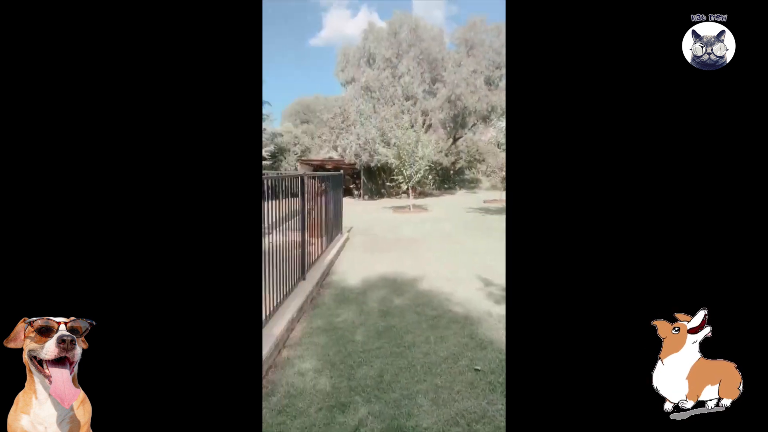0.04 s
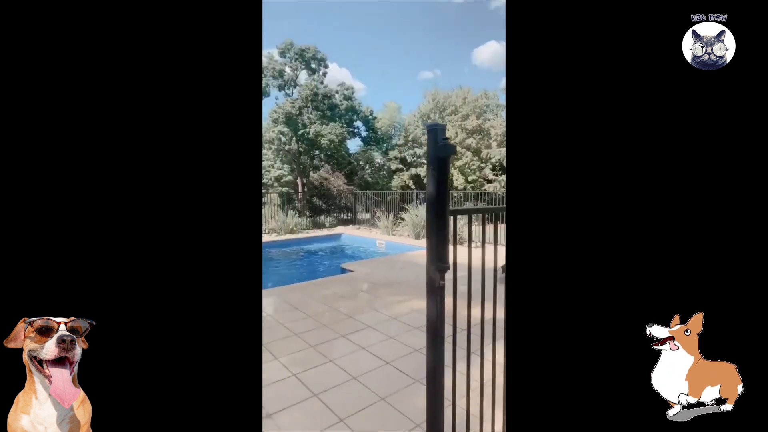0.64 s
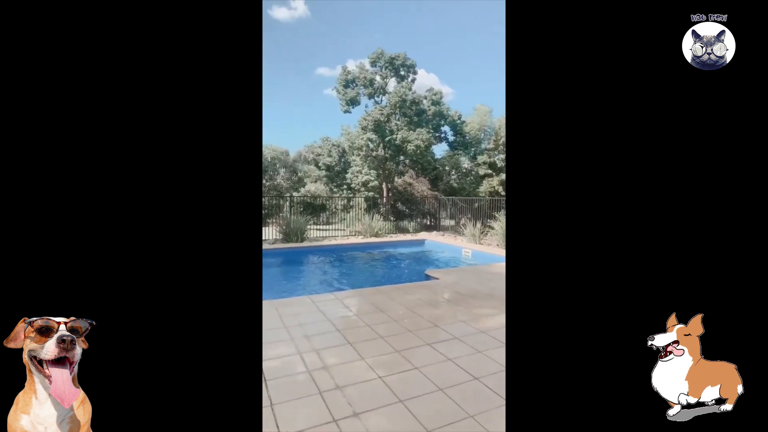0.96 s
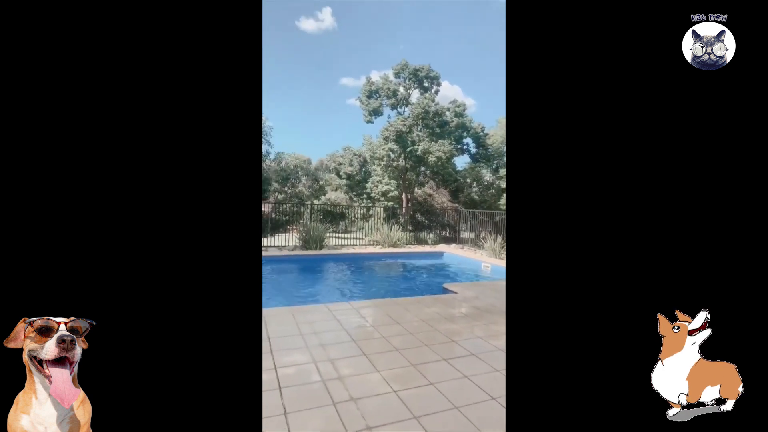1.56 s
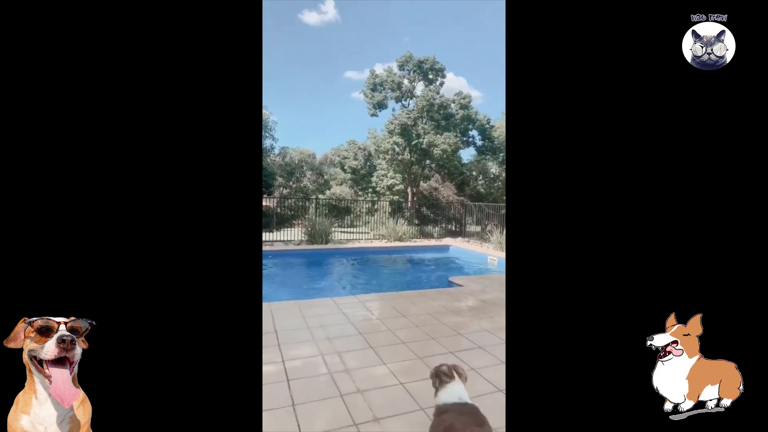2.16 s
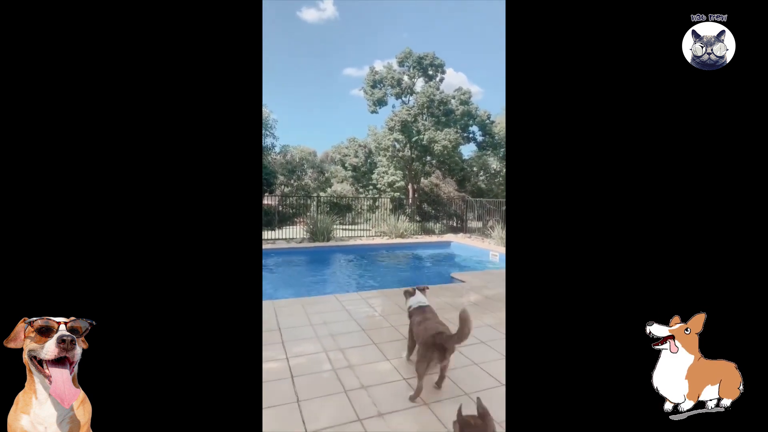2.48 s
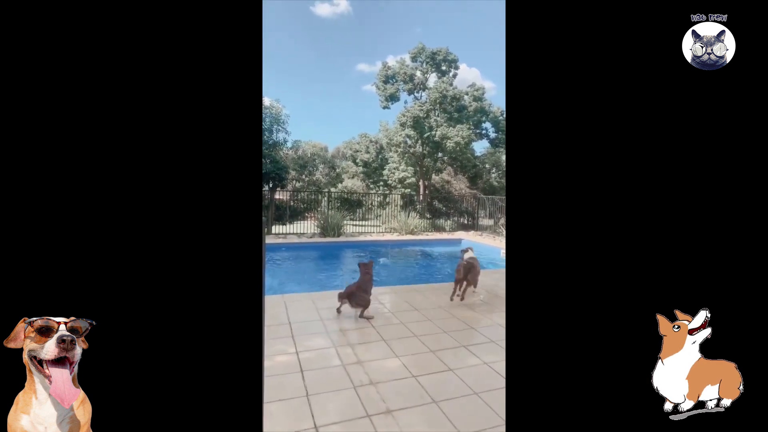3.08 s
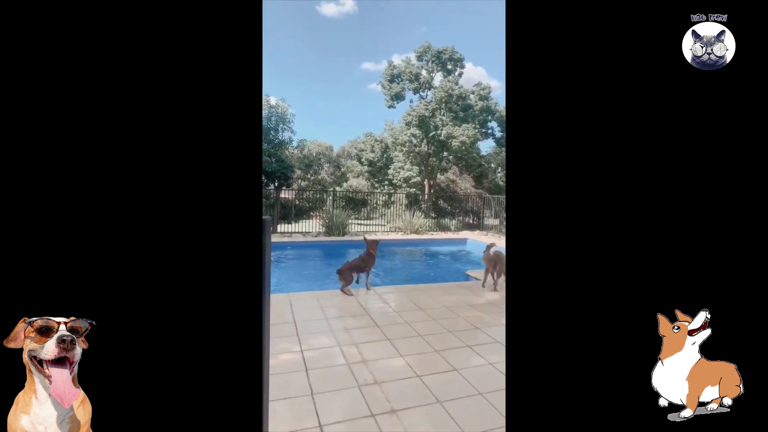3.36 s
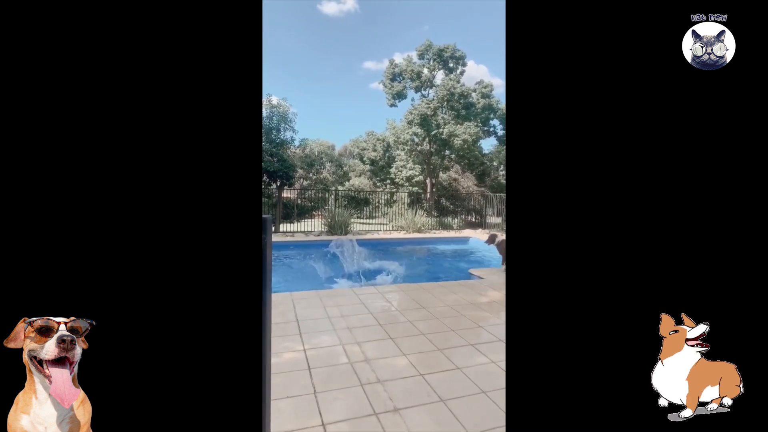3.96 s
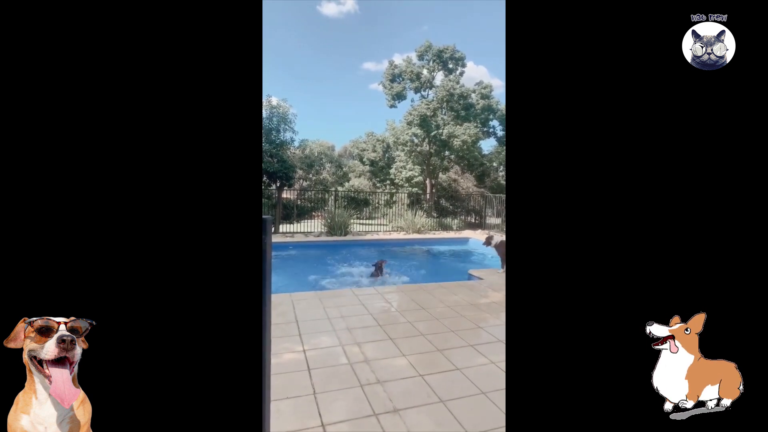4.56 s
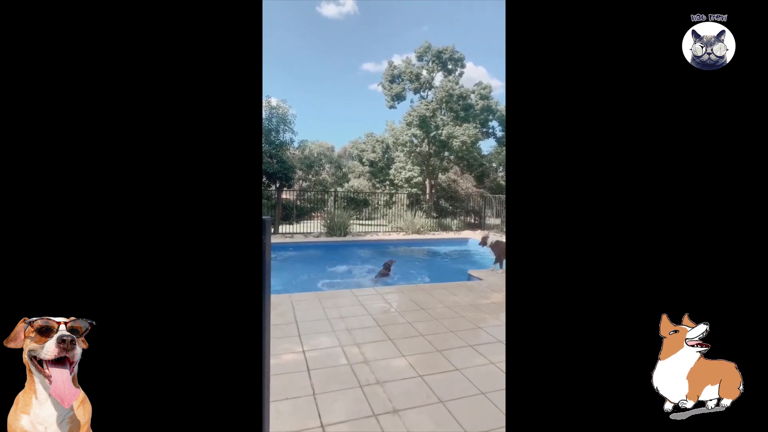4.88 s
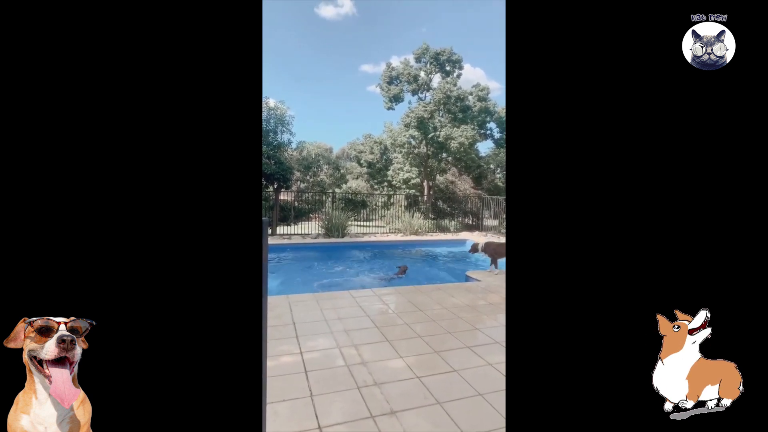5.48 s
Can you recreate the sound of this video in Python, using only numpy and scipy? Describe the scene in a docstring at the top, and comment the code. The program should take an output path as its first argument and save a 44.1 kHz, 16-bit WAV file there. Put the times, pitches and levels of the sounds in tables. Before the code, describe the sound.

In a backyard, a light breeze rumbles on the microphone over the faint hum of a pool pump. Two dogs race across a tiled deck, their metal collar tags jingling brightly as claws tap and skid. One pushes off and lands in the pool with a splash. Spray falls back, the water gurgles, and the dog paddles off with softer sloshes and drips.

```python
"""A breeze brushes the microphone, a pool pump hums and collar tags jingle in their ringing modes.
A bird whistles as two dogs race across a tiled deck, claws tapping and skidding in stick-slip friction.
One pushes off and leaps into the pool: paws slap the surface and trapped air pockets resonate in gulps.
Spray rains back over a churning bubble cloud, and the dog paddles off."""
import sys
import numpy as np
from scipy import signal
from scipy.fft import rfft, irfft
from scipy.io import wavfile
from scipy.ndimage import uniform_filter1d

SR = 44100
rng = np.random.default_rng(int(sys.argv[2]) if len(sys.argv) > 2 else 0)


def to_wav(sig):
    """Store sig (one row per channel, or 1-D mono) as 16-bit WAV at the path in sys.argv[1].

    Samples outside -1..1 are clipped; the rate is SR.
    """
    pcm = np.clip(np.atleast_2d(sig), -1, 1) * 32767
    pcm = np.round(pcm).astype(np.int16)
    wavfile.write(sys.argv[1], SR, pcm.T)  # frames by channels


N = 248283
T = np.arange(N) / SR

# claws skid and pads drag sand: time_s, level_db, resonance_hz, tip_db, tile_db, fade_s, sand_db
SKIDS = [(1.27, -61, 4500, 0, -15, .018, -70), (1.615, -44, 7500, 7.5, -9, 0.0061, -51),
         (2.063, -47, 6060, 7.5, -11, 0.018, -50), (2.106, -44, 3700, 10, -11, 0.0094, -50),
         (2.165, -41.5, 2370, 7, -5, 0.018, -47), (2.187, -26, 2410, 3.5, -15, 0.006, -48),
         (2.264, -38.5, 4020, 1.5, -7, 0.0073, -46), (2.28, -36, 4500, 4.5, -11, 0.0081, -43),
         (2.318, -40.5, 4500, 8, -18, 0.018, -47), (2.338, -43, 3400, -3, -11, 0.014, -50),
         (2.363, -42, 7000, -15, -18, 0.0091, -52), (2.429, -38, 2920, -1, -13, 0.012, -56),
         (2.568, -34.5, 2650, 6, -15, 0.024, -35), (2.733, -39, 3270, -20, -28, 0.014, -33),
         (2.695, -45, 4400, -3, -15, .02, -56), (2.756, -41, 2950, 2, -5, 0.0094, -44),
         (2.829, -39.5, 7240, -3, -8.5, 0.01, -47.5), (2.928, -37, 6750, -1, -22, 0.014, -39),
         (2.955, -33.5, 4760, -0.5, -12, 0.013, -46), (2.985, -39, 3900, 4, -9, 0.0054, -58),
         (3.028, -44, 4500, -3, -12, 0.023, -58), (3.173, -43.5, 4650, 6.5, -8, 0.025, -57),
         (3.258, -31, 6200, -3.5, -17, 0.012, -39), (3.301, -44, 6200, -0.5, -2.5, 0.04, -47),
         (3.437, -42.5, 2720, -18, -3.5, 0.015, -43.5), (3.507, -51, 4700, 0, -20, 0.0086, -40.5)]
# body and paws strike the water: time_s, level_db, centre_hz, attack_s, fade_s, spatter_db, churn_db
WATER_SLAPS = [(3.630, -43, 1100, 0.004, .008, -5, -62), (3.643, -26.5, 780, .0006, 0.0026, -13, -50),
               (3.668, -44, 770, 0.008, 0.041, -4.5, -52), (3.7565, -32, 1350, .0004, 0.002, -8, -48),
               (3.782, -50, 900, 0.012, 0.027, -1.5, -50.5), (3.822, -31, 1220, .0006, 0.01, -9.5, -49),
               (3.865, -42.5, 604, 0.012, .03, -1.5, -39), (3.912, -37, 616, 0.018, 0.017, -11, -34),
               (3.932, -36, 1120, 0.01, 0.026, -8.5, -53), (4.085, -42, 990, .008, 0.067, -23, -35.5),
               (4.455, -48, 600, .005, .015, -19, -40), (4.919, -37, 740, .001, .008, -12, -39),
               (5.045, -44.5, 1000, 0.026, 0.059, -21, -39), (5.18, -47.5, 850, 0.0071, 0.017, -18, -64),
               (5.423, -52, 1400, .002, 0.0053, 8.5, -70), (5.435, -46, 1280, 0.0037, .008, -19, -68)]


def tags(scatter_db=3, detune=0.0038, wobble=0.0075, clash_s=0.00071, chatter_db=-2, chatter_share=0.23):
    """Modal ringing: collar tags knock, then chatter; the discs rub, so each mode's pitch wobbles."""
    # knocks: start_s, level_db, t60_s, low_modes_db, main_ring_hz, clash_db
    hits = [(.228, -54, 0.036, 2, 10360, -8), (.25, -52, 0.043, 3, 10360, -11),
            (0.403, -53.5, 0.14, 5, 10360, -8), (.44, -56, .08, 7, 10360, -8),
            (.462, -54, 0.055, 8, 10360, -8), (.644, -53.5, .04, -10, 10360, -8),
            (.935, -43, 0.043, -3, 10360, -8), (1.616, -24.5, 0.023, 3, 10400, -4),
            (1.788, -44.5, 0.091, -12, 10400, -12), (1.835, -38, .027, -17, 10500, -14),
            (1.894, -40, 0.065, 0, 10430, -6), (1.961, -43, 0.15, 5, 10360, -1),
            (2.048, -30, 0.11, -3, 10400, -10), (2.096, -28.5, 0.11, -1, 10420, -9),
            (2.107, -19, 0.082, 0, 10460, -10), (2.323, -19.5, 0.079, -1.5, 10370, -11),
            (2.339, -19, .037, -10, 10420, -11), (2.362, -25.5, 0.059, -2, 10200, -2),
            (2.38, -25.5, 0.034, -4, 10130, -4), (2.424, -18.5, 0.044, -1, 10360, -3),
            (2.433, -23, 0.034, -2, 10570, -2), (2.533, -26, 0.045, 1, 10330, -8),
            (2.575, -30, .06, 3, 10100, 2), (2.692, -29, 0.11, -7, 10140, -6),
            (2.719, -19.5, .018, -8, 10100, -4), (2.817, -31, 0.055, -2, 10200, -3),
            (2.831, -30.5, 0.067, 5, 10130, 0), (3.095, -38, 0.1, -8, 10230, -8),
            (3.116, -35, 0.039, -4, 10320, -11), (3.620, -40, 0.05, -10, 10400, -9),
            (3.686, -32, 0.03, 8, 10260, -15), (3.713, -38, .06, -16, 10380, -12),
            (3.874, -39.5, 0.067, -10, 10250, -10)]
    # modes of a tag: pitch_hz, level_db, t60_share
    modes = [(7000, -7.5, 0.59), (7100, -16, 0.46), (7600, -6.5, 0.9), (8850, -8, 0.88), (8830, 0, 0.93),
             (10000, -22, .6), (10310, -4, 0.93), (10360, 5, 0.95), (10530, -10, 0.97), (10900, -23, .6),
             (11800, -28, .8), (13020, -13, .9), (13600, -15, .7), (15200, -18, .6)]
    free_ring_hz, low_modes_below_hz = 10360, 9500
    out, t = np.zeros(N), T[:SR // 4]
    mode_hz, mode_db, _ = np.transpose(modes)
    touches = clicks(1300, 1.6)
    rubbing = [walk(350) for _ in modes]
    for start, db, t60, low_db, main_hz, clash_db in hits:
        chance, i = rng.standard_normal((len(modes), 2)), int(start * SR)
        weights = undb(mode_db + low_db * (mode_hz < low_modes_below_hz) + scatter_db * chance[:, 0])
        weights /= np.linalg.norm(weights)
        chime = undb(clash_db) * band(rng.standard_normal(len(t)) * np.exp(-t / clash_s), 6700, 11800)
        for (hz, _, share), weight, shift, rub in zip(modes, weights, chance[:, 1], rubbing):
            pitch = hz * main_hz / free_ring_hz * (1 + detune * shift + wobble * rub[i:i + len(t)])
            chime += weight * sine(pitch) * undb(-60 * t / (t60 * share))
        chatter = touches[i:i + len(t)] * np.exp(-t / (chatter_share * t60))
        knocks = (t == 0) + undb(chatter_db) * chatter / np.linalg.norm(chatter)
        add(out, start, undb(db) * signal.fftconvolve(knocks, chime))
    return out


def buckle():
    """Damped vibration: a struck collar buckle chinks in a single mode."""
    # chinks: start_s, pitch_hz, level_db, t60_s
    chinks = [(1.857, 3660, -27, 0.022), (2.106, 3390, -30, 0.043), (2.188, 2780, -31, 0.051),
              (2.352, 7640, -21.5, 0.055), (2.574, 2763, -21.5, 0.084), (2.794, 8680, -37, 0.12),
              (4.003, 7100, -30, 0.043)]
    out = np.zeros(N)
    for start, hz, db, t60 in chinks:
        add(out, start, undb(db) * ring(hz, t60, onset_cycles=6.2))
    return out


def claw_on_tile(contact, hz, tip_db, tile_db):
    """Source and filter: contact force sounds through the tile, the claw's resonance and its hard tip."""
    resonance = band(contact, hz * .95, hz * 1.05, order=1)
    claw = undb(-2.5) * band(contact, 1550, 6040, order=3) + undb(-6) * resonance
    tile = band(contact, 140, 2120, order=3)
    tip = band(contact, 5230, 11070, order=3)
    return undb(tile_db) * tile + claw + undb(tip_db) * tip


def claws(grip_s=0.0047, lead_s=.03):
    """Impact and stick-slip friction: claws tap the tiles and skid over grit."""
    # taps: start_s, level_db, resonance_hz, tip_db, tile_db, contact_s
    taps = [(1.487, -45.5, 4300, 1, -20, 0.00087), (1.511, -49, 4500, 7, -20, .0008),
            (1.558, -30.5, 4670, -9, -6, 0.00028), (1.579, -38, 4970, -10, -20, .0003),
            (1.608, -39, 6500, -1, -2, .001), (1.7, -43.5, 3380, -7, 0, 0.0013),
            (1.713, -45, 2900, -12, -8, .001), (1.857, -32, 3680, 2.5, -21, .0006),
            (1.8675, -26.5, 4500, 4.5, -2.5, 0.00026), (2.190, -14.5, 4480, 5, -10, 0.001),
            (2.196, -24.5, 2660, 6.5, -3.5, 0.0021), (2.354, -30, 7000, -17, -1, 0.0017),
            (2.379, -32, 6700, 0, -2, 0.00097), (2.568, -23, 6900, -9, -16, 0.0026),
            (2.578, -30.5, 2770, -1, 2.5, .0015), (2.6277, -24, 3300, 5, 1, 0.0017),
            (2.687, -30.5, 6870, -8, -7, 0.0013), (2.774, -24, 4860, -6, -8.5, 0.0022),
            (2.874, -27, 5400, -4.5, -6.5, 0.0026), (2.9351, -25, 6700, 5, -23, 0.00089),
            (2.9504, -19.5, 6500, 1, -15, 0.00062), (2.968, -26, 5660, -12, -14, .0008),
            (2.9887, -26, 3630, -14, -12, 0.0014), (2.9925, -29, 4000, 2, -11, .0012),
            (3.0432, -30.5, 6340, -4.5, -12, 0.0017), (3.155, -34.5, 4600, 8, -5, 0.0017),
            (3.171, -39.5, 5140, 12, -11, 0.0016), (3.257, -25, 6250, 2.5, -17, 0.0011),
            (3.401, -27, 6440, 0, -10, .0008)]
    out, t = np.zeros(N), T[:SR // 6]
    for start, db, hz, tip_db, tile_db, contact_s in taps:
        contact = burst(np.exp(-t / contact_s), 100, 18000, order=1)
        add(out, start, undb(db) * claw_on_tile(contact, hz, tip_db, tile_db))
    # a sliding claw catches and lets go thousands of times a second
    grit = unit(clicks(9000, 2) * undb(3 * np.clip(walk(500), -2, 2)))
    for when, db, hz, tip_db, tile_db, fade_s, _ in SKIDS:
        contact = swell(t - lead_s, grip_s, fade_s) * grit[int(when * SR):][:len(t)]
        add(out, when - lead_s, undb(db) * claw_on_tile(contact, hz, tip_db, tile_db))
    return out


def pads(attack_s=0.0017, lead_s=.03):
    """Soft impact: pads slap the deck in bursts of noise and thud in quickly damped tones; the last, higher
    thud is a knock at the pool edge."""
    # slaps: time_s, level_db, centre_hz, fade_s
    slaps = [(2.276, -38, 560, .008), (2.340, -34.5, 1350, 0.0043), (2.354, -40, 1400, 0.0036),
             (2.375, -43, 845, .005), (2.572, -38, 1400, .003), (2.579, -41, 620, .004),
             (2.629, -38, 1140, .003), (2.659, -43, 1100, .005), (2.742, -47, 900, .004),
             (2.843, -47, 900, .004), (2.877, -41.5, 1050, 0.0087)]
    # thuds: start_s, pitch_hz, level_db, t60_s
    thuds = [(2.189, 290, -35, 0.017), (2.278, 230, -31, 0.086), (2.279, 343, -30, 0.049),
             (2.289, 108, -28.5, 0.092), (2.388, 76.6, -28.5, 0.056), (2.526, 210, -26.5, 0.022),
             (2.776, 258, -34.5, 0.033), (2.99, 250, -35.5, .04), (2.878, 335, -33.5, 0.033),
             (3.352, 1370, -29.5, 0.014)]
    out, t = np.zeros(N), T[:SR // 6] - lead_s
    for when, db, hz, fade_s in slaps:
        add(out, when - lead_s, undb(db) * burst(swell(t, attack_s, fade_s), hz / 1.5, hz * 1.76))
    for start, hz, db, t60 in thuds:
        add(out, start, undb(db) * ring(hz, t60, onset_cycles=0.11))
    return out


def sand(attack_s=0.031, release_s=0.051):
    """Granular friction: sliding pads drag fine sand, with a few coarse grains cracking in it."""
    # grit under the running dogs: time_s, level_db
    patter = [(1.2, -67), (1.75, -56.5), (2.01, -50), (2.2, -48), (2.87, -55.5), (3.13, -46.5),
              (3.19, -47.5), (3.36, -46), (3.59, -51), (3.74, -50), (3.8, -44.5)]
    # spectrum of the scuffing: frequency_hz, level_db
    spectrum = [(240, -49.5), (400, 1.5), (536, -3.5), (626, -17), (906, -12), (1400, -6.5), (1820, -7),
                (2670, -3), (3640, -7), (3990, 0), (5690, -4), (6050, -4.5), (6540, -1.5), (10500, 1),
                (16000, -20.5)]
    drag = undb(-1) * fader(patter)
    for when, *_, sand_db in SKIDS:
        drag = np.hypot(drag, undb(sand_db) * swell(T - when, attack_s, release_s))
    fine = clicks(16000, 3.6) * undb(2 * walk(160))
    coarse = undb(-8) * clicks(600, 2)
    return drag * colour(fine + coarse, spectrum)


def rasps(judder_share=.6, edge_share=0.31):
    """Friction-driven resonance: a slipping claw judders in a narrow band that slides with the load."""
    # slips: start_s, length_s, start_hz, end_hz, level_db
    slips = [(2.3105, 0.0085, 3890, 4760, -32.5), (2.311, 0.0071, 1750, 1950, -43.5),
             (2.722, 0.018, 3995, 3730, -37.5), (2.729, 0.033, 3006, 2690, -41.5),
             (2.797, 0.021, 2100, 2110, -50.5), (2.983, 0.013, 3580, 3860, -34.5),
             (3.410, 0.038, 3780, 2510, -48.5)]
    out = np.zeros(N)
    for start, length, from_hz, to_hz, db in slips:
        progress = np.linspace(0, 1, int(length * SR))
        judder = (walk(judder_share * from_hz) + 1j * walk(judder_share * from_hz))[:len(progress)]
        slide = np.exp(2j * np.pi * np.cumsum(from_hz * (to_hz / from_hz) ** progress) / SR)
        pressure = np.clip(np.minimum(progress, 1 - progress) / edge_share, 0, 1)
        add(out, start, undb(db) * unit(pressure * (judder * slide).real))
    return out


def push_off(start_s=3.17, end_s=3.545, edge_s=0.006, db=-47):
    """Sliding friction: the hind claws drag in one long scratchy hiss before the leap."""
    pressure = np.clip((T - start_s) / edge_s, 0, 1) * np.clip((end_s - T) / edge_s, 0, 1)
    catches = unit(clicks(5000, 3) * undb(2.5 * walk(150)))
    return undb(db + walk(24.55)) * pressure * band(catches, 3000, 6200)


def water_slaps(lead_s=.1):
    """Impact on water: each push of body or paw makes a low smack and a brighter spatter."""
    out, t = np.zeros(N), T[:SR // 3] - lead_s
    for when, db, hz, attack_s, fade_s, spatter_db, _ in WATER_SLAPS:
        push = swell(t, attack_s, fade_s)
        smack = burst(push, hz / 1.49, min(hz * 1.72, 1500), order=3)
        spatter = band(rng.standard_normal(len(t)) * push, 1600, 4700)
        add(out, when - lead_s, undb(db) * (smack + undb(spatter_db) * spatter))
    return out


def gulps(peak_share=0.31, waver_depth=0.036):
    """Cavity resonance: large air pockets glide as they sink or rise, and waver as they change shape."""
    # air pockets: start_s, length_s, start_hz, end_hz, level_db
    pockets = [(3.642, 0.01, 384, 336, -28), (3.757, 0.01, 380, 300, -35), (3.855, 0.052, 399, 600, -38),
               (3.894, 0.056, 342, 322, -26), (3.932, 0.045, 274, 220, -27.5),
               (3.988, 0.041, 216, 190, -29.5), (4.009, 0.05, 98, 130, -30), (4.035, 0.0574, 159, 292, -24),
               (4.083, 0.045, 191, 209, -19.5), (4.091, 0.036, 86, 100, -21.5),
               (4.112, 0.02, 276, 330, -22), (4.14, 0.035, 110, 95, -29), (4.214, 0.018, 290, 320, -28.5),
               (4.315, 0.075, 152, 292, -32), (4.337, 0.019, 443, 410, -32), (4.395, 0.066, 282, 318, -34),
               (4.454, 0.021, 215, 200, -27), (4.468, 0.04, 85, 95, -32), (4.505, 0.052, 270, 410, -38),
               (4.887, 0.015, 430, 400, -33.5), (4.912, 0.018, 498, 402, -30),
               (4.918, 0.022, 286, 205, -29.5), (4.936, 0.014, 135, 111, -25.5),
               (4.974, .07, 150, 221, -36.5), (5.048, 0.029, 418, 371, -26), (5.063, 0.035, 182, 320, -30),
               (5.086, 0.054, 314, 466, -36), (5.135, 0.047, 480, 554, -43.5),
               (5.281, 0.018, 550, 620, -43), (5.327, 0.045, 544, 950, -47.5), (5.444, 0.02, 393, 410, -37)]
    out = np.zeros(N)
    waver = 1 + waver_depth * walk(120)
    for start, length, from_hz, to_hz, db in pockets:
        progress = np.linspace(0, 1, int(length * SR))
        pitch = from_hz * (to_hz / from_hz) ** progress * waver[int(start * SR):][:len(progress)]
        envelope = np.sin(np.pi / 2 * np.interp(progress, [0, peak_share, 1], [0, 1, 0])) ** 2
        add(out, start, undb(db) * envelope * sine(pitch))
    return out


def plunge(peak_db, growth_db_per_s, hold_s, release_db_per_s, start_s=3.823, attack_s=0.017):
    """Exponential envelope of thrown water: it starts at once, lasts for hold_s, then dies away."""
    age = T - start_s
    below_peak_db = np.maximum(growth_db_per_s * (hold_s - age), release_db_per_s * (age - hold_s))
    return np.exp(np.minimum(age / attack_s, 0)) * undb(peak_db - below_peak_db)


def bubbles(lo_hz, hi_hz, cycles, spread_db, count, rise_octaves):
    """Bubble resonance: many small bubbles each ring for some cycles, rising in pitch as they fade."""
    out = np.zeros(N)
    for when, pitch, size, life in rng.random((count, 4)):
        hz = lo_hz * (hi_hz / lo_hz) ** pitch
        t60 = cycles * (.5 + life) / hz
        strength = undb(-spread_db * np.log(max(size, .03))) * np.sqrt(hz)
        add(out, when * T[-1], strength * ring(hz, t60, rise_octaves / t60, onset_cycles=0.23))
    return unit(out)


def churn(attack_s=0.0083, release_s=0.1):
    """Air entrainment: the plunge and every slap leave a cloud of ringing bubbles."""
    # spectrum of the cloud: frequency_hz, level_db
    spectrum = [(60, -30), (110, -13), (200, -7.5), (300, 1), (450, 2.5), (560, -3.5), (680, -11.5),
                (1200, -16), (1600, -40.5)]
    stirred = plunge(-40.5, growth_db_per_s=-1, hold_s=0.61, release_db_per_s=25)
    for when, *_, churn_db in WATER_SLAPS:
        stirred = np.hypot(stirred, undb(churn_db) * swell(T - when, attack_s, release_s))
    cloud = bubbles(112, 1340, cycles=10, spread_db=0, count=5200, rise_octaves=0.36)
    return stirred * colour(cloud, spectrum)


def spray():
    """Shot noise: countless falling drops and a fine fizz thin to a trickle around the swimming dog."""
    # spectra of the falling drops and of the fizz: frequency_hz, level_db
    drop_spectrum = [(320, -14), (550, -8.5), (750, -4.5), (1080, 2.5), (1400, -2.5), (1700, -4.5),
                     (2100, -2), (2400, -8), (2700, -5), (3250, -5), (3600, -20), (4300, -4), (4650, -12.5),
                     (5050, -7), (5500, -23), (7150, -40), (12100, -90)]
    fizz_spectrum = [(2820, -6), (4300, 0.5), (5050, 3), (5530, -4), (6400, -2), (6820, 2), (7330, -3),
                     (8000, 0.5), (8600, -3.5), (9130, 2), (9850, -4), (10900, 1), (11700, -3),
                     (12300, -11), (12900, -17), (14500, -25), (16000, -23)]
    impacts = clicks(4000, 2.8)
    plinks = undb(-10) * bubbles(715, 4690, cycles=32, spread_db=-0.5, count=5000, rise_octaves=0.39)
    flutter = undb(1.3 * walk(170))
    drops = colour((impacts + plinks) * flutter, drop_spectrum)
    fizz = colour(clicks(14000, 2.8) * flutter, fizz_spectrum)
    falling = plunge(-40.5, growth_db_per_s=8, hold_s=0.6856, release_db_per_s=24)
    fizzing = plunge(-44, growth_db_per_s=4, hold_s=0.77, release_db_per_s=44)
    lingering = plunge(-52, growth_db_per_s=14, hold_s=0.6, release_db_per_s=13.5)
    paddle_flick = undb(-53) * hump(5.38, width_s=0.13)
    trickle = np.hypot(lingering, paddle_flick)
    return drops * np.hypot(falling, trickle) + fizz * np.hypot(fizzing, undb(-4) * trickle)


def drips(tick_s=0.0024, patter_db=-54):
    """Drop impact: heavy drops smack the surface one by one, and stragglers patter down."""
    # heavy drops: start_s, level_db, centre_hz
    drops = [(3.822, -34, 4500), (4.081, -40, 5000), (4.603, -39, 4000), (4.765, -43, 3000),
             (4.863, -43, 6000), (4.917, -43, 5000), (5.095, -47, 5000), (5.263, -47, 6000),
             (5.321, -48, 4500), (5.362, -43, 6000), (5.423, -47, 3570)]
    out, t = np.zeros(N), T[:SR // 20]
    for start, db, hz in drops:
        add(out, start, undb(db) * burst(np.exp(-t / tick_s), hz / 2.3, hz * 1.7, order=6))
    patter = unit(band(clicks(150, 1.1), 2100, 9600, order=4))
    return out + undb(patter_db) * patter * hump(4.38, width_s=0.33)


def breeze(wander_db=0.4):
    """Turbulence: a light breeze rumbles on the microphone, its gusts adding in power."""
    # strength of the breeze: time_s, level_db
    strength = [(0, -42), (.75, -50.5), (1.5, -54), (2.3, -48), (4.2, -49), (5, -48), (5.63, -53.5)]
    # gusts: time_s, half_length_s, level_db
    gusts = [(0.112, 0.093, -35.5), (0.463, 0.12, -54), (2.36, 0.054, -47), (2.8, 0.04, -44),
             (3.471, 0.02, -37), (3.737, 0.037, -46), (4.772, 0.043, -49)]
    # spectrum of the rumble: frequency_hz, level_db
    spectrum = [(11, -31), (18, -3.5), (70, 4), (108, -12.5), (134, -13), (203, -33), (260, -41),
                (340, -62), (570, -120)]
    wind = fader(strength) * undb(wander_db * walk(6.3))
    for when, width_s, db in gusts:
        wind = np.hypot(wind, undb(db) * hump(when, width_s))
    return colour(rng.standard_normal(N), spectrum) * wind


def pump():
    """Periodic vibration: the pool pump hums in three wavering partials and opens up past the gate."""
    # partials: pitch_hz, level_db
    partials = [(123.8, -53.5), (371.4, -60), (748.3, -74)]
    hum = np.zeros(N)
    for hz, db in partials:
        amplitude = np.sqrt(2) * undb(db + 1.96 * walk(5.19))
        hum += amplitude * np.sin(2 * np.pi * hz * T + 0.15 * walk(16))
    nearness_db = np.interp(T, [0, .7, 3.2, 5.6], [-14.5, -0.5, 0.5, -6])
    return undb(nearness_db) * hum


def bird(lift_share=0.0196):
    """Frequency modulation: each thin whistle is a pure tone that lifts slightly, then sags."""
    # whistles: start_s, length_s, pitch_hz, level_db
    whistles = [(1.19, 0.03, 4350, -65), (1.39, 0.04, 3900, -64), (1.439, 0.165, 3950, -59)]
    out = np.zeros(N)
    for start, length, hz, db in whistles:
        progress = np.clip((T - start) / length, 0, 1)
        pitch = hz * (1 + lift_share * np.sin(2 * progress) + 0.0018 * walk(61.2))
        out += undb(db) * np.sqrt(np.abs(np.sin(np.pi * progress))) * sine(pitch)
    return out


def rustle(db=-64):
    """Narrow-band noise: a faint, brief rustle on the way through the gate."""
    return undb(db) * hump(0.44, width_s=0.083) * band(rng.standard_normal(N), 1670, 2150)


def garden(db=-53.5):
    """Ambient noise: leaves and distant air merge into a nearly steady wash."""
    # spectrum of the wash: frequency_hz, level_db
    spectrum = [(41, -25), (70, -2), (125, -5), (180, -6), (260, -14), (380, -12.5), (550, -17.5),
                (1200, -21), (2000, -26), (3500, -32), (10200, -33), (11900, -36.5), (13600, -46),
                (16000, -63)]
    return colour(rng.standard_normal(N), spectrum) * undb(db + 0.15 * walk(4.1))


def off_deck(x, mirror_db, lag_s=0.001512, blur_hz=4500):
    """Comb filtering: a late, duller mirror image in the tiles makes the direct sound hollow."""
    mirror = signal.sosfiltfilt(signal.butter(1, blur_hz, fs=SR, output="sos"), x)
    return x + undb(mirror_db) * np.interp(T - lag_s, T, mirror)


def yard(x, wet_db=-17, t60=0.093, gap_s=.006):
    """Early reflections: the house and fence return sparse, short echoes."""
    t = T[:SR // 2]
    echoes = band(clicks(2500, 2)[:len(t)], 150, 9000, order=1) * 1000 ** (-t / t60) * (t > gap_s)
    return x + undb(wet_db) * signal.fftconvolve(x, echoes / np.linalg.norm(echoes))[:N]


def undb(db):
    """Decibels to gain."""
    return 10 ** (np.asarray(db) / 20)


def unit(x):
    """Scale to rms 1."""
    return x / np.sqrt(np.mean(x ** 2))


def add(out, start_s, x):
    """Superposition: mix x into out from start_s."""
    i = max(int(start_s * SR), 0)
    out[i:i + len(x)] += x[:max(N - i, 0)]


def fader(rows):
    """Gain along a (time_s, level_db) curve, fading to silence before and after it."""
    times, db = np.transpose(rows)
    inside = np.interp(T, [times[0] - .03, times[0], times[-1], times[-1] + .1], [0, 1, 1, 0])
    return inside * undb(np.interp(T, times, db))


def swell(t, attack_s, release_s):
    """Exponential build-up to 1 at t = 0, then exponential fade."""
    return np.exp(np.minimum(t / max(attack_s, .001), -t / max(release_s, .002)))


def hump(time_s, width_s):
    """A bell-shaped rise and fall around time_s."""
    return np.exp(-((T - time_s) / width_s) ** 2)


def band(x, lo_hz, hi_hz, order=2):
    """Band-pass that keeps the rms of white noise."""
    hi_hz = min(hi_hz, .45 * SR)
    sos = signal.butter(order, [lo_hz, hi_hz], "band", fs=SR, output="sos")
    return signal.sosfilt(sos, x) * np.sqrt(SR / 2 / (hi_hz - lo_hz))


def colour(x, points):
    """Minimum-phase filter through (frequency_hz, level_db) points; rms 1 out."""
    hz, db = np.transpose(points)
    size = 2 ** 19
    bin_hz = np.arange(size // 2 + 1) * SR / size + 1
    cepstrum = irfft(np.log(undb(np.interp(np.log(bin_hz), np.log(hz), db))))
    # folding the cepstrum makes the filter causal
    cepstrum[1:size // 2] *= 2
    cepstrum[size // 2 + 1:] = 0
    return unit(irfft(rfft(x, size) * np.exp(rfft(cepstrum)))[:N])


def walk(rate_hz):
    """Smooth random wander; rms 1."""
    hold = int(SR / rate_hz)
    steps = np.repeat(rng.standard_normal(N // hold + 1), hold)
    return unit(uniform_filter1d(uniform_filter1d(steps, hold), hold)[:N])


def clicks(per_s, spread_db):
    """Random tiny impacts, a few much larger than the rest; rms 1."""
    sizes = undb(spread_db * np.minimum(rng.exponential(size=N), 5))
    return unit((rng.random(N) < per_s / SR) * sizes * np.sign(rng.standard_normal(N)))


def burst(push, lo_hz, hi_hz, order=2):
    """A short noise in one band, with the energy of the push that makes it."""
    x = band(rng.standard_normal(len(push)) * push, lo_hz, hi_hz, order=order)
    return x * np.linalg.norm(push) / np.linalg.norm(x)


def sine(pitch_hz):
    """A tone whose phase is the integral of its changing pitch."""
    return np.sin(2 * np.pi * np.cumsum(pitch_hz) / SR)


def ring(hz, t60, octaves_per_s=0, onset_cycles=0):
    """Damped oscillator: a sine that builds up, glides and dies away."""
    t = T[:int(max(t60, .002) * SR)]
    build = 1 - np.exp(-t * hz / max(onset_cycles, 1e-3))
    return build * sine(hz * 2 ** (octaves_per_s * t)) * 1000 ** (-t / t[-1])


def scene():
    """Superposition of everything around the pool, at one microphone."""
    running = off_deck(claws() + pads() + sand() + rasps() + push_off(), mirror_db=-12.5)
    collars = tags() + buckle()
    smacks, cloud = water_slaps(), churn()
    splash = off_deck(smacks + spray() + drips(), mirror_db=-10.5) + cloud + gulps()
    foreground = yard(collars + running + splash + bird() + rustle())
    return (foreground + garden() + breeze() + pump())[None]


def record(dry, top_hz=16000):
    """Band limiting: a steep low-pass cuts the highest treble."""
    return signal.sosfilt(signal.ellip(10, .2, 80, top_hz, fs=SR, output="sos"), dry)


dry = scene()
out = record(dry)
to_wav(out)
```